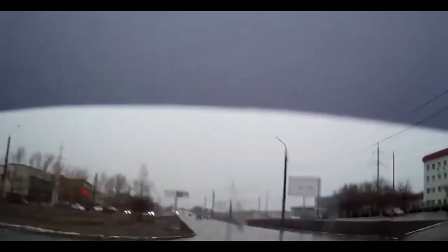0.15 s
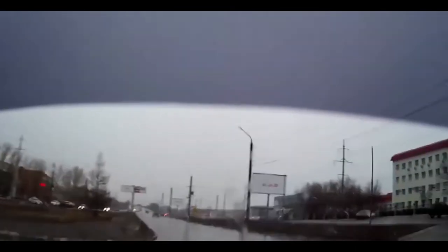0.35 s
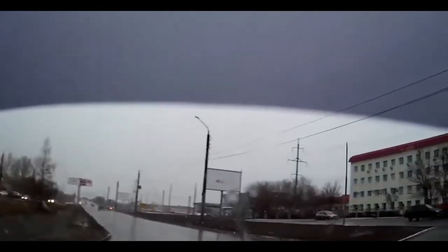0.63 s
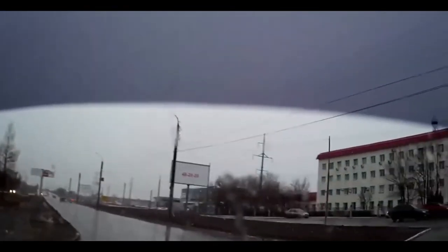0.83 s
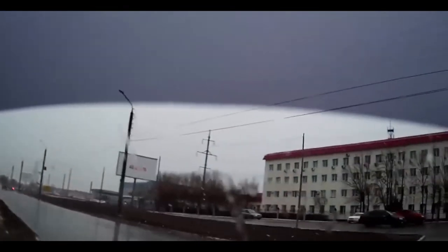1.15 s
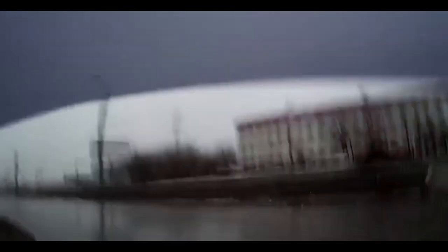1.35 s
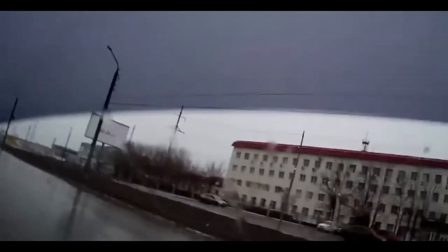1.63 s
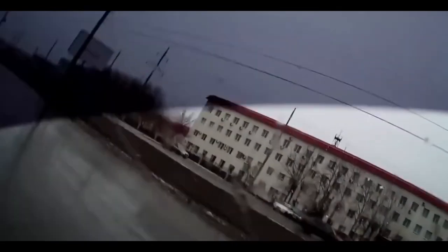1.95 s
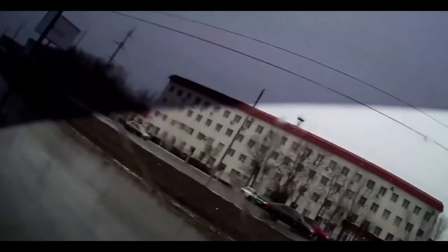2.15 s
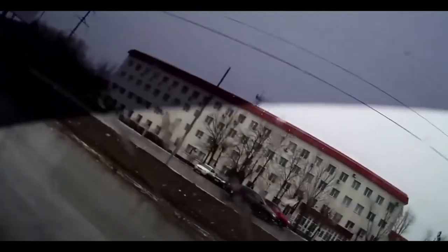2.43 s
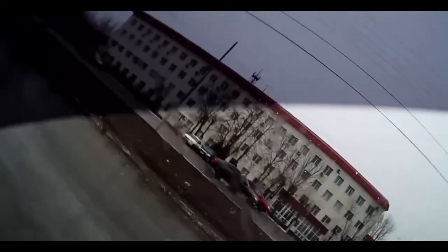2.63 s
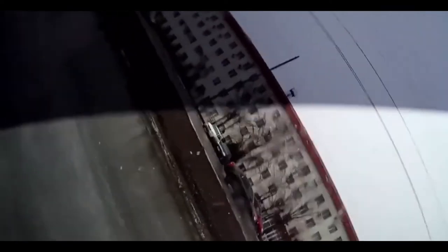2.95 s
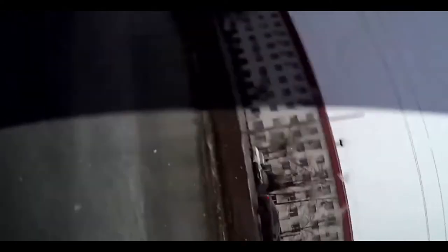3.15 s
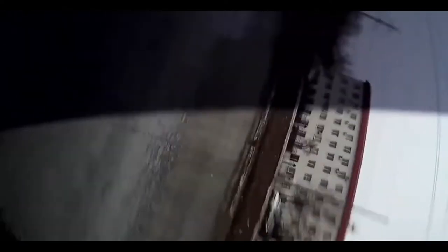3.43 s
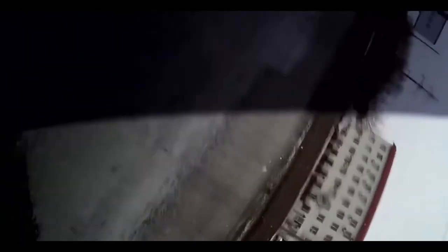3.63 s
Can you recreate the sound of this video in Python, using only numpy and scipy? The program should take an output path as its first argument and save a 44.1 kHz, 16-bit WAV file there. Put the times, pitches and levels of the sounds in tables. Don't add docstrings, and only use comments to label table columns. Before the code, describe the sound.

A car crashes and rolls: skidding tyres squeal, a heavy thud, knocks, then a dense crunch

```python
import sys
import numpy as np
from scipy import signal
from scipy.fft import rfft, irfft
from scipy.io import wavfile
from scipy.ndimage import uniform_filter1d

SR = 44100
rng = np.random.default_rng(int(sys.argv[2]) if len(sys.argv) > 2 else 0)


def master(y):
    cut = np.clip(np.atleast_2d(y).T, -1, 1)
    pcm = np.round(cut * 32767)
    wavfile.write(sys.argv[1], SR, pcm.astype(np.int16))


def volts_from_decibels(level):
    exponent = np.asarray(level, float) / 20
    return 10 ** exponent


N = 167580


def rms_one(x):
    return x / np.sqrt(np.mean(x ** 2) + 1e-20)


def in_time(rows):
    s, *columns = np.transpose(rows)
    return [np.interp(np.arange(N) / SR, s, c) for c in columns]


def drift(rate_hz):
    r = np.exp(-2 * np.pi * rate_hz / SR)
    walk = signal.lfilter([1], [1, -2 * r, r * r], rng.standard_normal(N + SR))
    return rms_one(walk[SR:])


def colour(x, points):
    hz = np.maximum(np.fft.rfftfreq(len(x), 1 / SR), 1)
    points = np.array(points)
    gain_db = np.interp(np.log(hz), np.log(points[:, 0]), points[:, 1])
    return irfft(rfft(x) * volts_from_decibels(gain_db), len(x))


def resonance(x, hz, width_hz):
    r = np.exp(-np.pi * width_hz / SR)
    zeros = np.array([1, 0, -1]) * (1 - r * r) / 2
    return signal.lfilter(zeros, [1, -2 * r * np.cos(2 * np.pi * hz / SR), r * r], x)


def burst(length_s, attack_s, grain_db):
    t = np.arange(SR // 8) / SR
    length_s = max(length_s, .002)
    lumps = np.repeat(rng.standard_normal(len(t) // 64 + 1), 64)[:len(t)]
    shape = (1 - np.exp(-t / attack_s)) * np.exp(-(t / length_s) ** 1.22)
    return shape * volts_from_decibels(grain_db * lumps) * rng.standard_normal(len(t))


def add(out, s, db, x):
    i = int(s * SR)
    out[i:i + len(x)] += (volts_from_decibels(db) * x / np.abs(x).max())[:len(out) - i]


# time in seconds, roar level in dB, spray brightness in dB.
GRIP = [(0, -23.5, 5), (.1, -26.5, 3.5), (.21, -19.5, 2), (.6, -18, 2), (.95, -24.5, 7), (1.45, -23.5, 3.5),
        (1.62, -20.5, -3.5), (1.83, -26.5, -4.5), (2.1, -31, 0.5), (2.47, -31, -19), (2.54, -42.5, -7),
        (2.96, -41.5, 1.5), (3.04, -30.5, -3), (3.22, -30.5, -9), (3.35, -12.5, -2.5), (3.46, -28, -6),
        (3.66, -17, 2), (3.74, -30, 9.5)]
# frequency in Hz, density in dB per Hz.
ROAR_SPECTRUM = [(240, -107), (400, 1), (550, 2.5), (1160, 0.5), (1360, -8), (2530, -14), (3910, -35),
                 (4500, -35), (5850, -59), (9900, -120)]
RUMBLE_SPECTRUM = [(12, -47), (20, -2), (141, -7), (241, -5), (335, 1), (600, -27.5), (780, -29),
                   (1320, -120)]
HISS_SPECTRUM = [(1760, -40), (3000, -26), (3700, -14.5), (11400, -13.5), (14800, -36), (15500, -42),
                 (15800, -65)]


def road():
    db, bright_db = in_time(GRIP)
    swing_db = db - db.mean()
    white = rng.standard_normal((4, N))
    roar = rms_one(colour(white[0], ROAR_SPECTRUM))
    low = signal.sosfiltfilt(signal.butter(3, 1200, fs=SR, output="sos"), roar)
    roar = volts_from_decibels(db + 2.13 * drift(24.7)) * (low + volts_from_decibels(bright_db) * (roar - low))
    rumble_db = -28.5 + 0.55 * swing_db + 3.7 * drift(4.9)
    rumble = volts_from_decibels(rumble_db) * rms_one(colour(white[1], RUMBLE_SPECTRUM))
    hiss_db = -52 + 0.33 * swing_db + 2.5 * drift(25)
    hiss = volts_from_decibels(hiss_db) * rms_one(colour(white[2], HISS_SPECTRUM))
    boom_db = -30 + 0.21 * swing_db
    boom = volts_from_decibels(boom_db) * rms_one(resonance(white[3], hz=139.1, width_hz=20.7))
    return roar + rumble + hiss + boom


WHEEL_HOP_HZ, TREAD_SLIP_HZ = 21.86, 33.1


def stick_slip(rows, width_hz, steady, bead_depth, bead_hz):
    hz, db = in_time(rows)
    phase = 2 * np.pi * np.cumsum(hz * (1 + 0.00943 * drift(5.94))) / SR
    swing = steady + drift(width_hz) + 1j * drift(width_hz)
    limited = 2 * swing / np.sqrt(1 + np.abs(swing) ** 2 / 2)
    bead_phase = 2 * np.pi * np.cumsum(bead_hz * (1 + 0.13 * drift(3.6))) / SR
    beads = 1 + bead_depth * np.sin(bead_phase)
    return volts_from_decibels(db) * beads * np.imag(limited * np.exp(1j * phase))


# time in seconds, pitch in Hz, level in dB.
WHISTLE = [
    (.1, 1014, -90),
    (0.199, 1024, -29.5),
    (.34, 1045, -26.5),
    (.45, 1007, -88),
]
# ratio to the pitch, level in dB.
WHISTLE_ORDERS = [(1, 3), (1.6, -10), (1.999, -18), (2.42, -10)]


def whistle():
    out = np.zeros(N)
    for ratio, db in WHISTLE_ORDERS:
        rows = np.array(WHISTLE) * [1, ratio, 1]
        out += volts_from_decibels(db) * stick_slip(rows, 30 * ratio, 0.6, 0.25, WHEEL_HOP_HZ)
    return out


# time in seconds, pitch in Hz, level in dB.
JUDDER = [
    (.1, 330, -51),
    (.17, 325, -24),
    (.3, 328, -22.5),
    (.95, 340, -29.5),
    (1.04, 335, -41),
    (1.1, 322, -22.5),
    (1.4, 327, -28),
    (1.6, 330, -103),
]


def judder():
    return stick_slip(JUDDER, width_hz=14.3, steady=0.85, bead_depth=0.61, bead_hz=WHEEL_HOP_HZ)


# time in seconds, pitch in Hz, level in dB.
SQUEAL = [
    (.58, 870, -36),
    (.66, 874, -25.5),
    (.85, 890, -18.5),
    (.88, 860, -23.5),
    (.93, 830, -19),
    (1.08, 810, -17.5),
    (1.3, 774, -19.5),
    (1.345, 730, -19.5),
    (1.465, 724, -17.5),
    (1.476, 694, -67),
]


def squeal():
    return stick_slip(SQUEAL, width_hz=38.5, steady=0.39, bead_depth=0.5, bead_hz=TREAD_SLIP_HZ)


# frequency in Hz, density in dB per Hz.
RATTLE_SPECTRUM = [(880, -23), (1500, -5.5), (2660, 3.5), (3750, -5.5), (4270, -4), (7940, -9.5),
                   (9570, -3), (14800, -27), (15800, -43)]
# time in seconds, ticks per second, level in dB.
DEBRIS = [
    (0, 40, -25),
    (1.5, 36, -31.5),
    (2.95, 53, -34.5),
    (3.05, 102, -24.5),
    (3.4, 300, -35),
]


def debris():
    rate, db = in_time(DEBRIS)
    struck = rng.random(N) < rate * volts_from_decibels(4.0 * drift(8)) / SR
    clicks = struck * volts_from_decibels(db + 2.87 * np.minimum(rng.exponential(1, N), 4))
    ticks = signal.lfilter([1], [1, -.97], clicks) * rng.standard_normal(N)
    return colour(ticks, RATTLE_SPECTRUM) * volts_from_decibels(-1.0)


# start in seconds, peak in dB.
RATTLES = [(0.0362, -19.5), (0.1474, -28), (0.345, -28), (0.3887, -16.5), (0.4445, -26), (0.5025, -16),
           (0.6596, -25), (0.7582, -5), (0.936, -28.5), (1.3228, -11.5), (1.468, -15), (1.5056, -20.5),
           (1.5573, -21), (1.576, -18), (1.6053, -20.5), (1.8934, -25), (1.9313, -23)]
# start in seconds, peak in dB.
TICKS = [(2.09, -19), (2.105, -22), (2.217, -26), (2.664, -30), (2.679, -34), (2.71, -28), (2.804, -31),
         (2.932, -34.5), (3.042, -37), (3.071, -27), (3.127, -22), (3.137, -28), (3.147, -31),
         (3.176, -19.5), (3.242, -21), (3.341, -13)]
# start in seconds, peak in dB, length in seconds.
CRACKS = [(1.979, -19, 0.018), (2.0068, -7.5, 0.0048), (2.188, -15, 0.0081), (2.266, -27.5, 0.013),
          (2.364, -24.5, 0.0076), (2.577, -23.5, 0.012), (2.611, -18.5, 0.015), (3.018, -24, 0.012),
          (3.257, -12, 0.014), (3.321, -12, 0.097), (3.36, 0, 0.01), (3.3825, -15, 0.011),
          (3.4, -3.5, 0.01), (3.415, -4.5, 0.0054), (3.431, -5.5, 0.006), (3.4758, -9.5, 0.0067),
          (3.499, -15.5, 0.029), (3.5343, -8.5, 0.0087), (3.554, -17.5, 0.045), (3.61, -9.5, 0.0084),
          (3.628, -16, 0.014), (3.651, -11.5, 0.013), (3.704, -16, 0.014), (3.772, -17, 0.052)]


def rattles():
    out = np.zeros(N)
    events = [(s, db, 0.01) for s, db in RATTLES]
    events += [(s, db, 0.0026) for s, db in TICKS]
    events += list(CRACKS)
    for s, db, length_s in events:
        x = colour(burst(length_s, 0.24 * length_s, grain_db=4.2), RATTLE_SPECTRUM)
        tilt = [(2000, rng.normal(-3, 4)), (6000, rng.normal(0, 4)), (12000, 0)]
        add(out, s, db, colour(x, tilt))
    return out


# start in seconds, peak in dB, pitch in Hz, length in seconds.
PINGS = [(0.502, -12, 2047, 0.011), (0.504, -9.5, 2480, 0.0084), (0.767, -11, 2700, 0.0059),
         (0.762, -12, 2260, .008), (1.615, -3.5, 695, 0.003), (1.779, -16, 874, 0.017),
         (1.947, -4.5, 850, 0.0035), (1.948, -12.5, 1580, 0.0067), (1.953, -9.5, 880, 0.019),
         (1.989, -3.5, 900, 0.004), (2.106, -0.5, 788, 0.0055), (2.107, -3.5, 1490, 0.0055),
         (2.125, -18, 900, 0.0071), (2.235, -23, 880, .01), (2.193, -15.5, 580, 0.0068),
         (2.265, -6, 898.5, 0.019), (2.303, -22, 920, 0.0098), (2.369, -21, 1170, 0.013),
         (2.378, -21, 760, 0.006), (2.439, -13.5, 886, 0.012), (3.091, -14.5, 514, 0.019),
         (3.11, -17.5, 880, 0.027), (3.243, -17, 1128, 0.018), (3.268, -10, 2284, 0.0071),
         (3.4736, -8, 2320, 0.0065), (3.4745, -10, 760, 0.0041), (3.5045, -13, 780, 0.0039),
         (3.502, -23, 2370, 0.0068), (3.5354, -3.5, 2800, 0.0032), (3.5365, -5.5, 1026, 0.0041),
         (3.54, -7.5, 2240, .008), (3.555, -10, 2076, 0.0096), (3.628, -9, 2080, 0.0027),
         (3.634, -13, 2620, 0.0086), (3.672, -14.5, 1040, 0.0064)]


def pings():
    out, t = np.zeros(N), np.arange(SR // 10) / SR
    for s, db, hz, length_s in PINGS:
        length_s = max(length_s, .002)
        shape = (1 - np.exp(-t / (0.24 * length_s))) * np.exp(-(t / length_s) ** 1.76)
        width_hz = 0.43 * hz
        grit = resonance(rng.standard_normal(len(t)), hz, width_hz)
        grit = rms_one(resonance(grit, hz, width_hz))
        waver = 0.47 * rms_one(uniform_filter1d(rng.standard_normal(len(t)), size=150))
        add(out, s, db, shape * (np.sin(2 * np.pi * hz * t + waver) + volts_from_decibels(-5) * grit))
    return out


# frequency in Hz, width in Hz, level in dB.
PANEL = [(535, 450, -3.5), (870, 140, 2), (1080, 240, 2), (2140, 1650, -16)]


def panel_blows(rows, rise, broad_db):
    out = np.zeros(N)
    shell = [(150, -16), (450, 7.5), (1200, -1.5), (1600, 4.5), (2800, -1), (3600, -47), (8000, -22)]
    for s, db, length_s in rows:
        x = burst(length_s, rise * length_s, grain_db=3.2)
        broad = colour(x, shell)
        modes = np.zeros(len(x))
        for hz, width_hz, mode_db in PANEL:
            ring = resonance(resonance(x, hz, 2 * width_hz), hz, width_hz)
            modes += volts_from_decibels(mode_db + rng.normal(0, 1)) * ring
        add(out, s, db, rms_one(modes) + volts_from_decibels(broad_db) * rms_one(broad))
    return out


# start in seconds, peak in dB, length in seconds.
KNOCKS = [(1.516, -14.5, 0.053), (1.6, -8.5, 0.017), (1.885, -10.5, 0.018), (1.986, -9, 0.017),
          (2.263, -11.5, 0.017), (2.374, -24, 0.036), (2.44, -20.5, 0.013), (3.243, -5.5, 0.026),
          (3.307, -18, 0.026), (3.352, -7, 0.027), (3.649, -13, 0.0095), (3.767, -3.5, 0.041)]


def knocks():
    return panel_blows(KNOCKS, rise=0.45, broad_db=-4)


# start in seconds, peak in dB, length in seconds.
SNAPS = [
    (1.948, -13.5, 0.016),
    (2.105, -3.5, 0.0078),
    (3.403, 1, 0.029),
    (3.5355, -9, 0.013),
    (3.548, -7, 0.012),
    (3.609, -4.5, 0.017),
]


def snaps():
    return panel_blows(SNAPS, rise=0.016, broad_db=-0.5)


# start in seconds, peak in dB, pitch in Hz.
THUDS = [(1.467, 2.5, 323), (1.597, -9.5, 296), (1.627, -13.5, 176), (1.911, -14, 146), (1.964, -9.5, 317),
         (1.975, -11.5, 168), (1.866, -17, 347), (2.014, -3.5, 156), (2.056, -10, 135), (2.085, -9.5, 140),
         (2.1, -7.5, 225), (2.129, -25, 168), (2.149, -17, 151), (2.173, -16.5, 190), (2.235, -18, 143),
         (2.582, -12.5, 334), (2.621, -5.5, 201), (2.632, -6.5, 143), (2.658, -23, 142),
         (2.853, -18.5, 350), (2.992, -6.5, 183), (3.023, -13.5, 168), (3.039, -12, 148), (3.062, -21, 159),
         (3.099, -11.5, 172), (3.111, -8, 155), (3.12, -4.5, 144), (3.133, -13, 163), (3.144, -7.5, 143),
         (3.16, -9, 160), (3.19, -6, 164), (3.205, -10, 150), (3.217, -9, 151), (3.232, -11, 140),
         (3.252, -9, 154), (3.269, -8.5, 143), (3.313, -6, 305), (3.54, -8.5, 300), (3.604, -8, 244)]


def thuds():
    out, t = np.zeros(N), np.arange(SR // 8) / SR
    for s, db, hz in THUDS:
        t60_s = 10.5 / hz
        decay = volts_from_decibels(-60 * t / max(t60_s, .01))
        ring = np.sin(2 * np.pi * hz * t) * decay * (1 - np.exp(-t / 0.003))
        puff = resonance(burst(t60_s / 3, 0.00083, grain_db=7.6), hz * 1.7, 530)
        puff = resonance(puff, hz * 1.49, 160)
        add(out, s, db, ring + volts_from_decibels(-14) * puff / np.abs(puff).max())
    return out


def cabin(x):
    t = np.arange(SR // 5) / SR
    t60_s, tail_db = 0.035, -18
    dull = signal.lfilter([1], [1, -.5], rng.standard_normal(len(t)))
    tail = dull * volts_from_decibels(-60 * t / t60_s) * (t > .002)
    tail /= np.sqrt(np.sum(tail ** 2))
    return x + volts_from_decibels(tail_db) * signal.fftconvolve(x, tail)[:N]


def scene():
    tyres = whistle() + judder() + squeal()
    contacts = debris() + rattles() + pings() + knocks() + snaps()
    mono = road() + tyres + thuds() + cabin(contacts)
    return np.array([mono, mono])


def top_cut(x):
    return signal.sosfilt(signal.butter(12, 15980, fs=SR, output="sos"), x)


def record(dry):
    ceiling = 1.12
    x = ceiling * np.tanh(dry / ceiling)
    grit = volts_from_decibels(-39.5) * signal.lfilter([1, -.7], [1], x[0]) * rng.standard_normal(N)
    side = grit + 0.013 * resonance(x[0], hz=62, width_hz=214)
    wide = x + side * np.array([[1], [-1]])
    low_pass = signal.cheby2(12, 60, 15900, fs=SR, output="sos")
    return top_cut(signal.sosfilt(low_pass, wide))


dry = scene()
out = record(dry)
master(out)
```